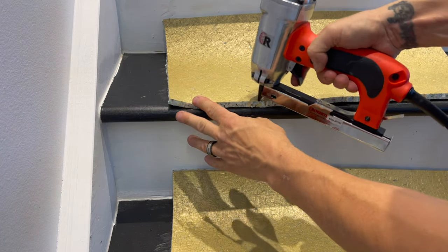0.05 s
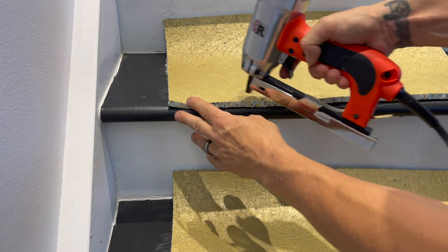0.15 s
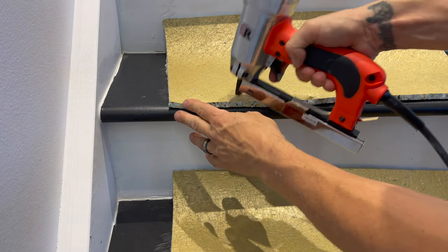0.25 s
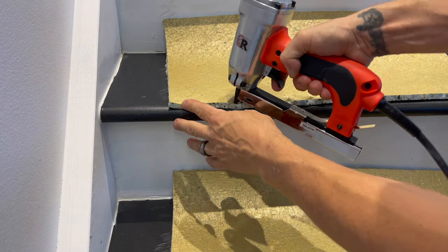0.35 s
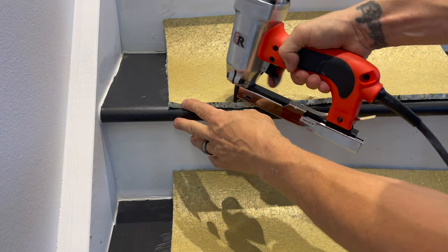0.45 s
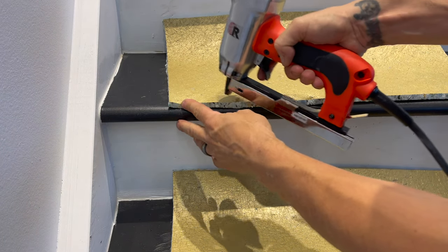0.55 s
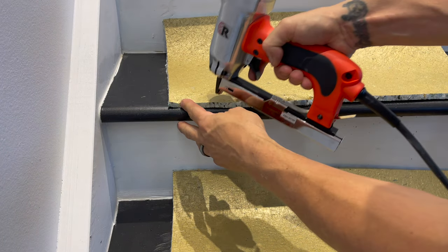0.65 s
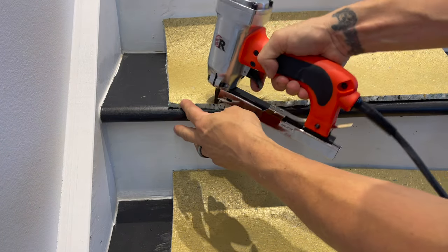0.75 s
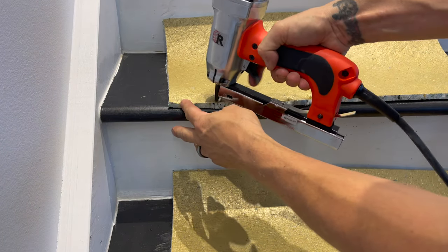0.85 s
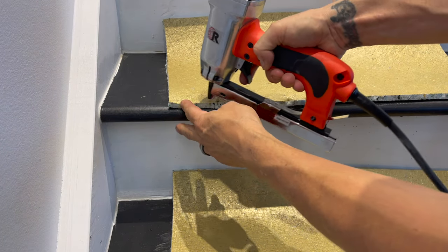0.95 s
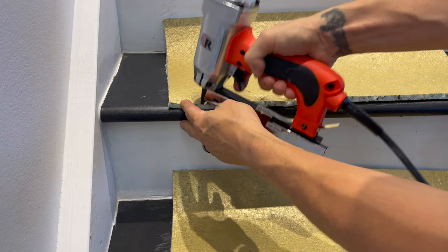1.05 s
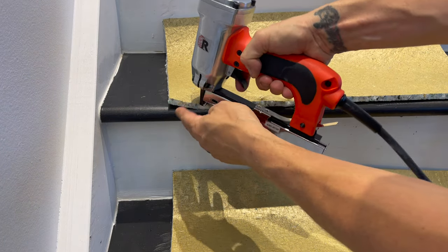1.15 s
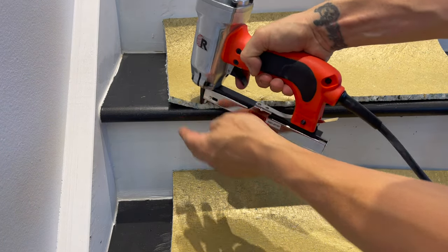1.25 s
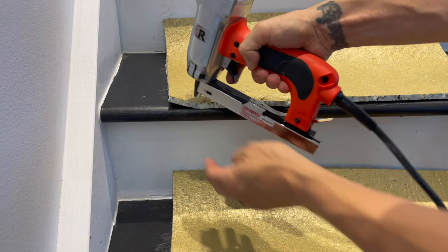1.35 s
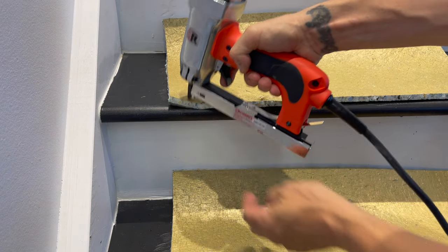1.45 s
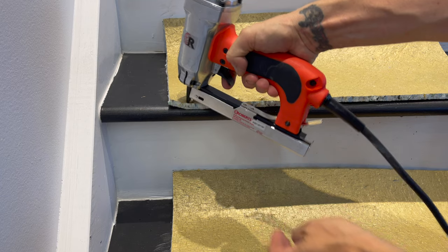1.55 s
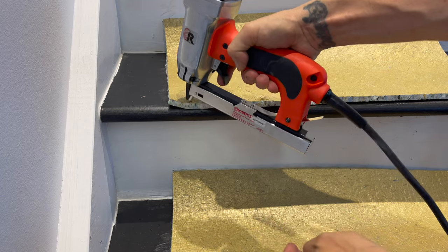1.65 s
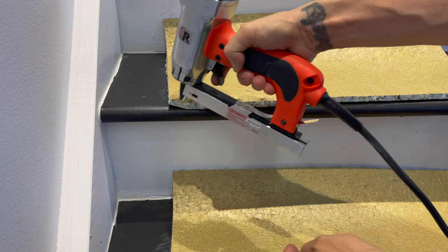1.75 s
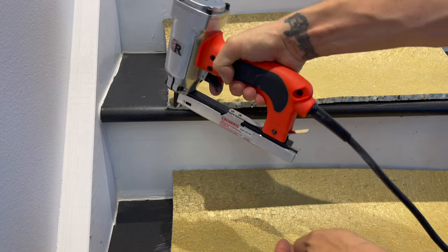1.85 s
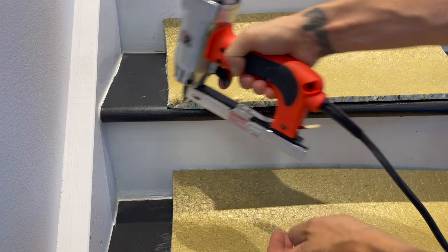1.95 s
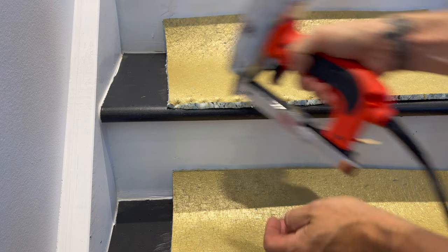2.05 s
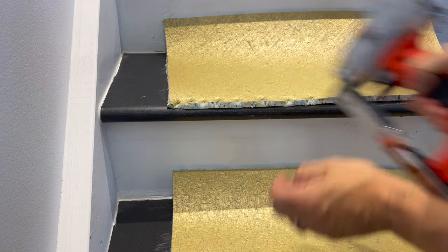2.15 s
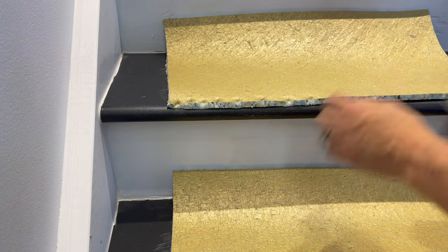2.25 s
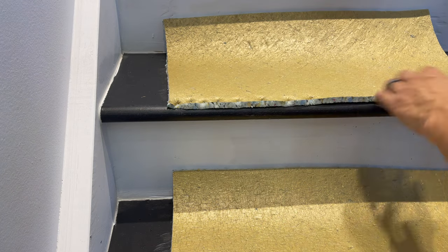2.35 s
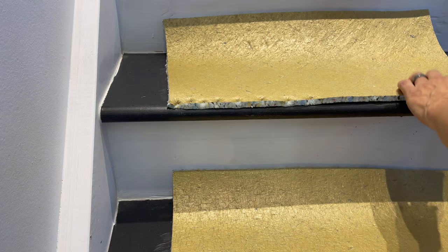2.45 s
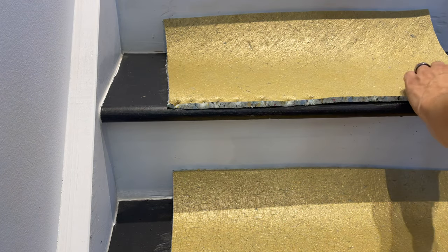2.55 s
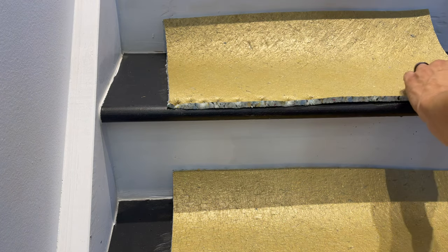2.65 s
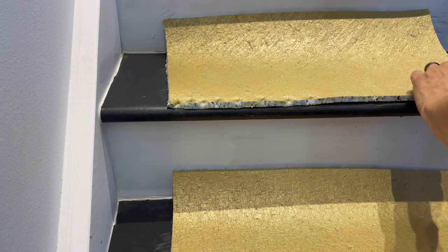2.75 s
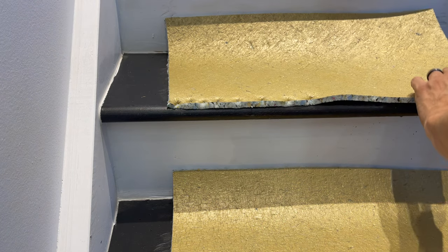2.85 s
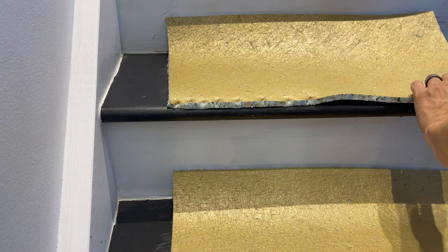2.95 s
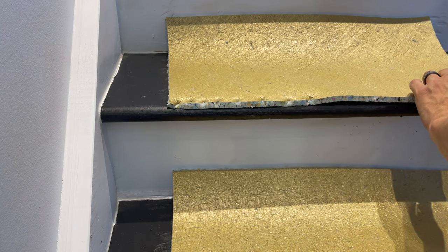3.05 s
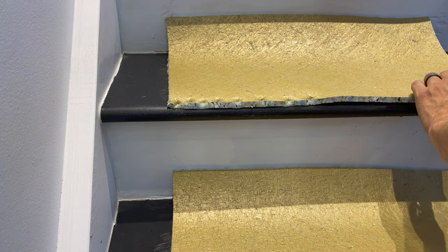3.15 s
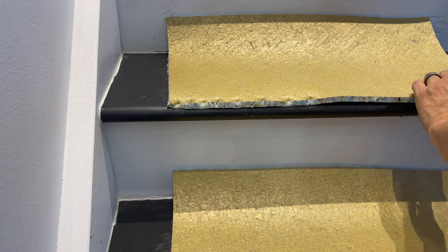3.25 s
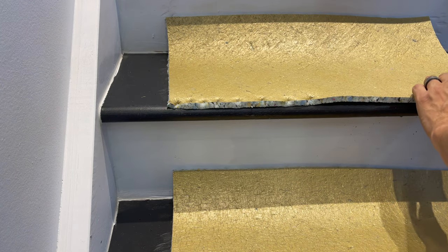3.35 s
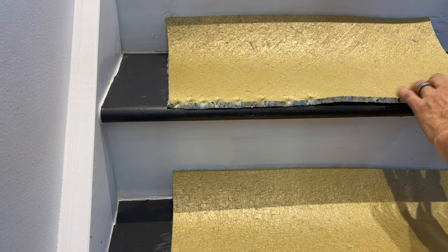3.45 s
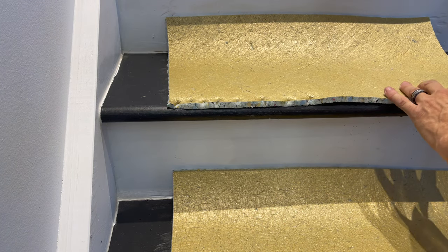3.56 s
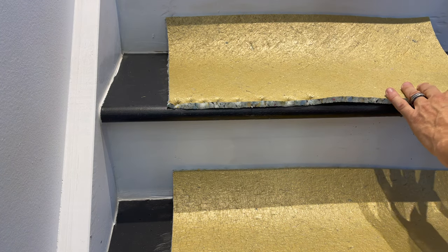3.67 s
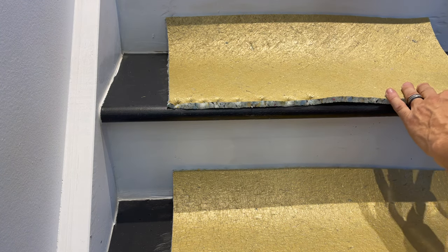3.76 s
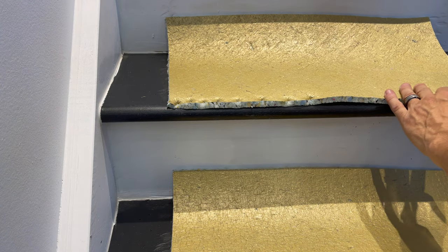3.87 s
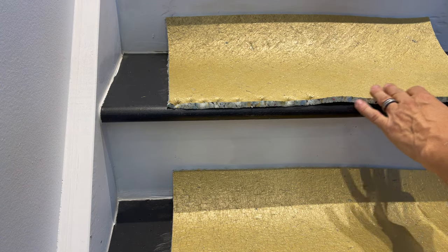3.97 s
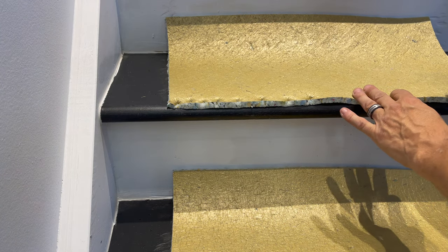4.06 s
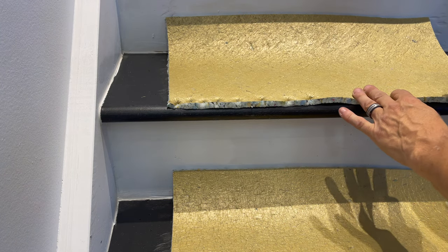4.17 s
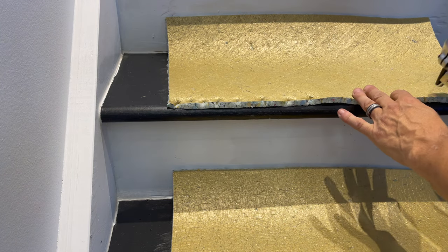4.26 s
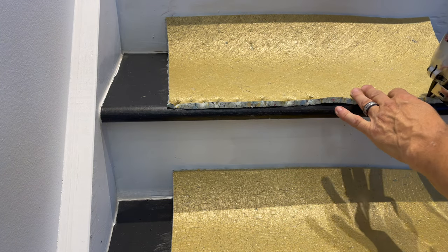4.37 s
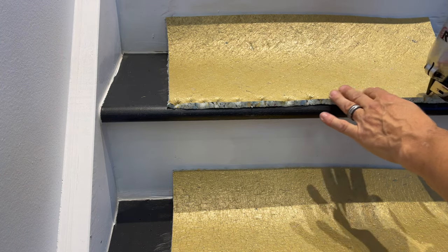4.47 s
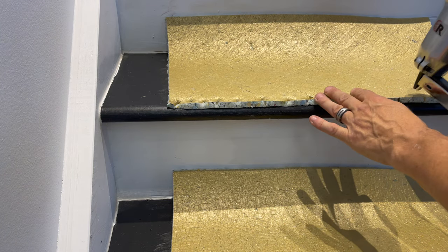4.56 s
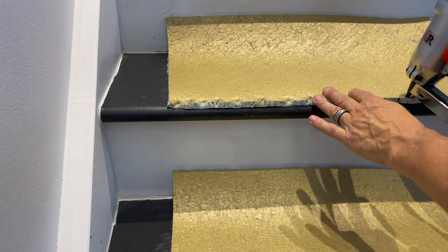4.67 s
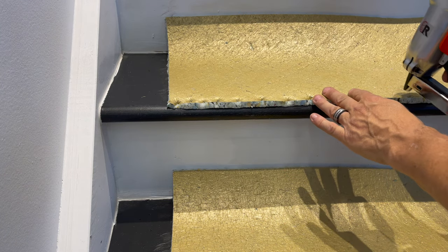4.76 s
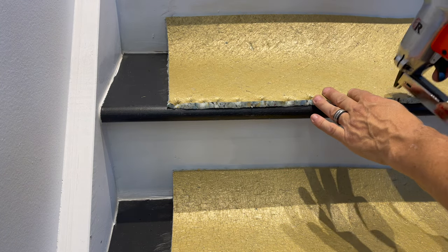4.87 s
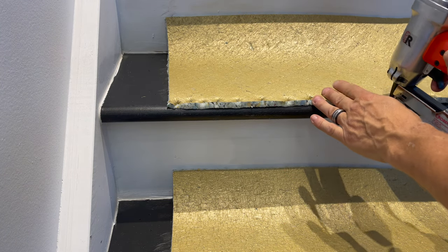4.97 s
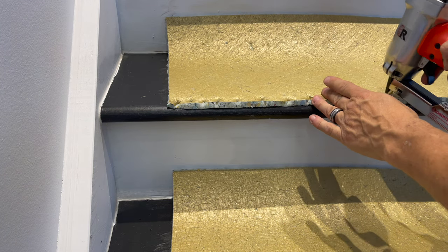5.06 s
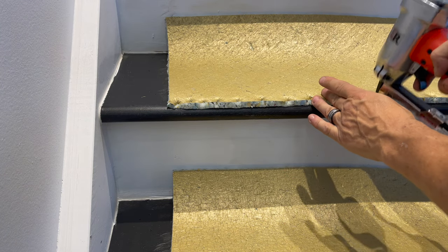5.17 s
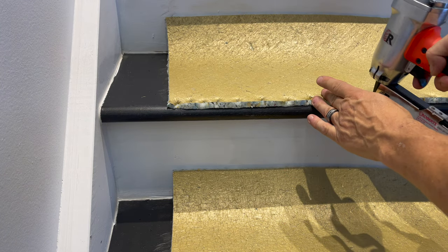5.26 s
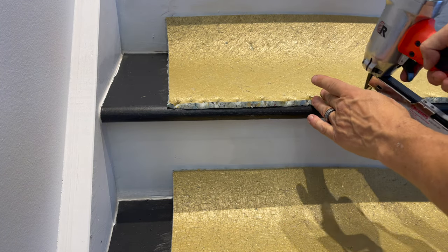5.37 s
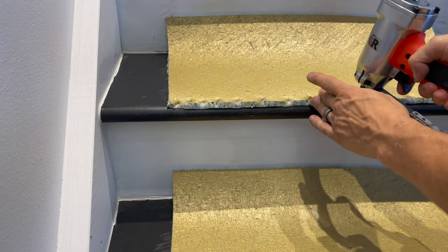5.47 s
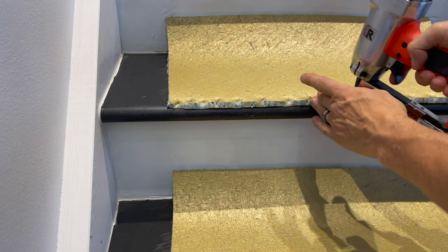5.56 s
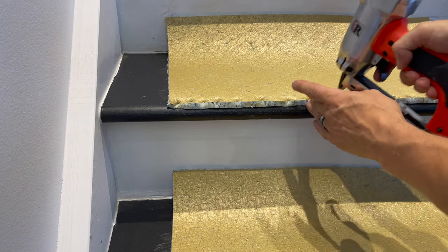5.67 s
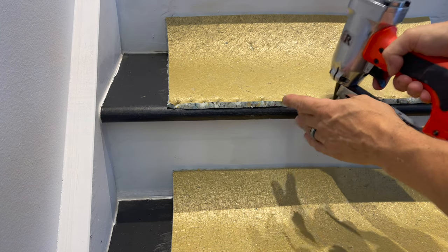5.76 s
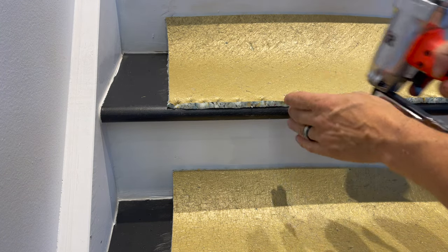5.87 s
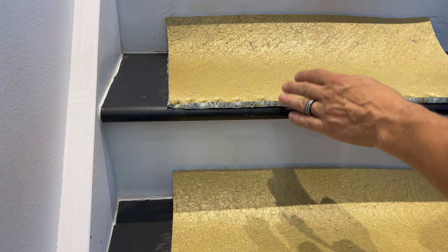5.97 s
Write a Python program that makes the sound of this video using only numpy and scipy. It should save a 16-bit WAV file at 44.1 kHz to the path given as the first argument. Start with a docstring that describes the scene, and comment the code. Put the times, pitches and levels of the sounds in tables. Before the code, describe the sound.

Indoors on a stair, loud snapping staple shots come in two runs, each a burst of metal rattle over a short wooden knock and low boom. Between the runs, hands rub cloth and padding, something is set down with dull knocks, and a barely audible squeak rises. The second run is faster and woodier, with light clicks and faint steel ringing. The phone is close, the peaks are squashed, and quiet room noise and hum lie beneath.

```python
"""Staple gun on a stair

An electric staple gun is pressed onto a padded wooden stair and fired, in two quick runs, close to a phone.
Each shot is chattering noise coloured by the metal casing, over struck modes of the hollow stair.
A small stairwell rings on as fading echo, over house noise and a faint mains hum of wavering tones.
Presses, ticks, trigger clicks, rubbing cloth, dull knocks, a thin squeak and two chimes fall in between."""
import sys
import numpy as np
from scipy import signal
from scipy.fft import rfft, irfft, next_fast_len
from scipy.io import wavfile
from scipy.ndimage import uniform_filter1d

SR = 44100
rng = np.random.default_rng(int(sys.argv[2]) if len(sys.argv) > 2 else 0)


def attenuation_scalar(level_db):
    """Turn a level in dB into a linear amplitude multiplier (20 dB per decade)."""
    decades = np.asarray(level_db, float) / 20
    return 10 ** decades


def inscribe(sig):
    """Save sig as 16-bit PCM at rate SR to the path in sys.argv[1].

    A 1-D sig is mono; a 2-D sig holds one channel per row.
    Samples are clipped to [-1, 1] before scaling.
    """
    pcm = np.round(np.clip(np.atleast_2d(sig).T, -1, 1) * 32767)
    wavfile.write(sys.argv[1], SR, pcm.astype(np.int16))


N = 265122
LEAD = 8820  # samples before time zero, for a shot already ringing


def evened(x):
    """Scales to rms 1."""
    return x / np.sqrt(np.mean(x ** 2) + 1e-20)


def read(points, hz):
    """Reads a table along log frequency."""
    f, value = np.transpose(points)
    return np.interp(np.log(hz + 1), np.log(f + 1), value)


def add(mix, s, sound):
    """Mixes a sound in at s seconds."""
    part = mix[LEAD + round(s * SR):][:len(sound)]
    part += sound[:len(part)]


def coloured(x, gain):
    """Filters x by a function of frequency."""
    size = next_fast_len(len(x))
    spectrum = rfft(x, size) * gain(np.fft.rfftfreq(size, 1 / SR))
    return irfft(spectrum, size)[:len(x)]


def ring(modes, contact_ms, seconds):
    """Modes struck by a force that lasts contact_ms: longer contact, duller sound."""
    t = np.arange(round(seconds * SR)) / SR
    sound = np.zeros(len(t))
    for hz, db, t60, *swing in modes:
        sound += np.prod(swing) * attenuation_scalar(db - 60 * t / t60) * np.cos(2 * np.pi * hz * t)
    u = np.arange(441) / SR * 1000 / contact_ms
    force = np.sin(np.pi * np.minimum(u, 1)) ** 2
    return signal.oaconvolve(sound, force / force.sum())


def rattle(t60_ms, rise_ms, grit_db):
    """A burst of metal parts chattering: noise made of uneven clicks."""
    ms = np.arange(4000) / SR * 1000
    click_size = np.repeat(rng.standard_normal(4000 // 16), 16)
    noise = evened(rng.standard_normal(4000) * attenuation_scalar(grit_db * click_size))
    return noise * (1 - np.exp(-ms / rise_ms)) ** 2 * attenuation_scalar(-60 * ms / t60_ms)


# broad resonances of the casing: f/Hz, width/Hz
CASING_RESONANCES = [(1650, 190), (2050, 160), (2830, 78), (4300, 83), (5050, 210), (5800, 420),
                     (7800, 230), (9900, 43)]
# the gun's broad colour: f/Hz, level/dB
CASING_COLOUR = [(150, -31), (300, -8.5), (700, -5), (1200, -5), (2000, -3.5), (3500, -7.5), (6000, -13.5),
                 (10000, -20), (15300, -23), (16500, -51)]


def gun_body(x, tilt_db, ring_hz, ring_db):
    """The casing colours every rattle causally: a broad spectrum with resonances on top."""
    hz = abs(np.fft.fftfreq(2048, 1 / SR))
    # each blow wakes the resonances unevenly
    struck = 0.26 * attenuation_scalar(4.7 * rng.standard_normal(len(CASING_RESONANCES)))
    peaks = attenuation_scalar(ring_db) / (1 + ((hz / ring_hz - 1) / .07) ** 2)
    for height, (f, width) in zip(struck, CASING_RESONANCES):
        peaks += height / (1 + (2 * (hz - f) / width) ** 2)
    tilt = tilt_db * np.log2((hz + 300) / 2500)  # dB per octave, roughly
    gain = attenuation_scalar(read(CASING_COLOUR, hz) + tilt + 7.5) * (1 + peaks)
    minimum_phase = np.exp(np.conj(signal.hilbert(np.log(gain + 1e-5))))
    response = np.fft.ifft(minimum_phase).real
    return signal.oaconvolve(x, response[:1024])


# the hollow stair and the air in the stairwell: f/Hz, level/dB, t60/s, swing (weight, + out, - in)
BOOM_MODES = [(95, 0, 0.023, 0.33), (96.5, -4.5, 0.14, -0.87), (114.3, -1, 0.3, -0.87),
              (117, -41.5, 1.4, -1.7), (130.7, -22, 0.91, 0.88), (153.2, -16, 0.026, 1)]


def stair_boom(contact_ms, seconds):
    """The low modes of the hollow stair and its air, set off by one push."""
    return ring(BOOM_MODES, contact_ms, seconds)


# the wood of the stair: f/Hz, level/dB, t60/s, swing (weight, + out, - in)
WOOD_MODES = [(190.3, -6, 0.034, 1), (245.8, -9, 0.09, 0.51), (290.7, -1, 0.063, 0.71),
              (358.3, -10, 0.22, -1), (390.8, -5.5, 0.052, 1), (432.8, -9, 0.15, -1),
              (482.3, -8, 0.17, 0.92), (576.5, -4.5, 0.082, 1), (623, -11.5, 0.054, 1),
              (723, -15.5, .06, 0.77), (964, -2, 0.047, 0.99), (1056, -20.5, 0.016, 0.14)]


def tread_knock():
    """The wood struck by the driver; each spot on the tread wakes the modes unevenly."""
    modes = []
    for hz, db, *rest in WOOD_MODES:
        shift, level = rng.standard_normal(2)
        modes.append((hz * (1 + .015 * shift), db + 2.2 * level, *rest))
    return ring(modes, 0.58, 0.32)  # the driver bears on the wood for 0.58 ms


def hand_push():
    """A hand's push: the wood sounds duller than under a shot, with the low boom under it."""
    return attenuation_scalar(-3.5) * ring(WOOD_MODES, 2.22, 2) + stair_boom(1.6, 2)


# fading of the stairwell: f/Hz, t60/s
STAIRWELL_T60 = [(200, 0.5), (560, 0.31), (1470, 0.29), (3000, 0.28), (5000, 0.3), (7500, 0.25),
                 (10500, 0.25), (13000, 0.21), (16000, 0.064)]


def dying(x, longer=1):
    """Makes each band of x fade at the stairwell's own speed, its t60 stretched by longer."""
    hz, t, z = signal.stft(x, SR, nperseg=256)
    fade = attenuation_scalar(-60 * t / longer / read(STAIRWELL_T60, hz)[:, None])
    return signal.istft(z * fade, SR, nperseg=256)[1]


def dense_echo():
    """The thick echo of a blow: fading noise that builds up over the first reflections."""
    near, far = rng.standard_normal((2, SR // 2))
    swell = 1 - np.exp(-np.arange(SR // 2) / SR / 0.0056)
    echo = dying(near) + attenuation_scalar(-18.5) * dying(far, longer=2.55)  # rooms beyond ring longer
    return echo[:SR // 2] * swell


# shots: t/s of the driver's blow, gun level/dB, stair boom level/dB, launch level/dB, casing ring f/Hz
SHOTS = [(-.09, -3.5, -12, -7.5, 2100), (0.3283, -1, -12.5, -14.5, 2386), (0.7464, -1, -14, -9, 2150),
         (1.129, 0, -16.5, -22, 1593), (1.5135, -3, -16.5, 1.5, 2210), (1.8295, -1, -16.5, -5.5, 1946),
         (3.3635, -1.5, -14.5, -11, 1780), (3.6976, -2, -14, -10, 2164), (4.014, -1.5, -12, -18, 2116),
         (4.315, -2.5, -12, -14, 2020), (4.6149, -1, -13, -17.5, 2144), (4.8976, -1.5, -12.5, -12.5, 2078),
         (5.182, -2, -11, -15, 2835), (5.4316, -2, -9.5, -10, 2147), (5.699, -1.5, -9, -27, 2226)]
# strokes inside one shot: t/ms after the blow, level/dB, rattle t60/ms, share reaching the stair (0-1)
STROKES = [(0, 5, 39.2, 0.17), (4.508, 3, 30, 0.7), (10.103, -2.5, 12, 0.3), (17.55, -7.5, 16, 0.4),
           (31.46, -13.5, 21, 0)]
# the wooden knock of a shot, which grows along each run: t/s, level/dB
TREAD_LEVEL = [(.3, -10), (1.83, -8), (3.36, -9), (4.3, -6), (5.7, -5)]


def shots(metal, stair, wash):
    """The coil launches the driver, which lands in several strokes on casing and stair."""
    launch_ms, tilt_db = 3.4, 1.43  # launch before landing; brightness per octave
    boom = stair_boom(2.2, 1.5)
    for s, gun_db, boom_db, launch_db, ring_hz in SHOTS:
        launch = gun_body(rattle(60, 0.24, 2.1), tilt_db + 2.0, ring_hz, -3)
        add(metal, s - launch_ms / 1000, attenuation_scalar(launch_db) * launch)
        wood = attenuation_scalar(np.interp(s, *np.transpose(TREAD_LEVEL))) * tread_knock()
        for ms, db, t60_ms, share in STROKES:
            stroke = gun_body(rattle(t60_ms, .2, 0.97), tilt_db, ring_hz, -1.4)
            add(metal, s + ms / 1000, attenuation_scalar(gun_db + db) * stroke)
            add(stair, s + ms / 1000, share * wood)
        # the boom starts 1.5 ms early, to make up for the bass filter's delay
        add(stair, s - .0015, attenuation_scalar(boom_db) * boom)
        echo = gun_body(dense_echo(), tilt_db + .5, 2000, -20)
        add(wash, s, attenuation_scalar(gun_db - 15.5) * echo)


def stairwell(x):
    """Sparse reflections of random sign; three tails take turns."""
    turn, out = np.arange(len(x)) / SR * 2.3, np.zeros(len(x))
    for k in range(3):
        taps = np.zeros(SR)
        at = np.arange(300, SR - 20, 16)
        taps[at + rng.integers(0, 16, len(at))] = rng.choice([-1., 1.], len(at))
        tail = dying(taps)
        window = np.cos(turn + k * np.pi / 3) * np.sqrt(2 / 3)
        out += signal.oaconvolve(x * window, tail / np.linalg.norm(tail))[:len(x)]
    return out


# colour of the house noise: f/Hz, level/dB per Hz before the whole is set to its rms
AIR_COLOUR = [(20, -23), (40, -13.5), (70, -11.5), (120, -1), (180, -20.5), (245, -13.5), (330, -10),
              (600, -12.5), (960, -17), (1600, -20.5), (5000, -31), (8000, -37), (15000, -45.5),
              (16600, -45.5)]


def house_air():
    """Quiet house noise: steady noise through a fixed colour, at -69 dB rms."""
    noise = coloured(rng.standard_normal(N), lambda hz: attenuation_scalar(read(AIR_COLOUR, hz)))
    return attenuation_scalar(-69) * evened(noise)


# mains and appliance tones: f/Hz, level/dB
HUM_TONES = [(118.4, -79), (242.2, -81.5), (371.4, -85.5), (565.2, -86), (947.5, -83), (990.5, -83.5)]


def mains_hum():
    """Low tones whose pitch and level waver together."""
    hum = np.zeros(N)
    for hz, db in HUM_TONES:
        waver = evened(uniform_filter1d(uniform_filter1d(rng.standard_normal(N), 900), 900))
        turns = 2 * np.pi * np.cumsum(hz + 1.1 * waver) / SR
        hum += attenuation_scalar(db + 3.6 * waver) * np.sqrt(2) * np.sin(turns)
    return hum


# one thin bright tick: f/Hz, level/dB, t60/s
JITTER_MODES = [(5000, 3, .016), (6500, -7, .006), (8500, -4, .007), (9600, -3, .007), (10500, -4, 0.008),
                (13000, -13, .004)]


def jitter(metal):
    """A fading patter of thin bright ticks follows each shot, each tick a little off pitch and time."""
    after_s, length_s, per_s = .105, .3, 77
    start_db, fade_db_per_s = -54, 36.5  # start relative to the shot's gun level
    for shot, gun_db, *_ in SHOTS:
        for since in np.arange(0, length_s, 1 / per_s):
            late, size, *uneven = rng.standard_normal(2 + len(JITTER_MODES))
            modes = [(hz * (1 + 0.025 * u), db, t60) for (hz, db, t60), u in zip(JITTER_MODES, uneven)]
            level_db = gun_db + start_db + 1.5 * size - fade_db_per_s * since
            add(metal, shot + after_s + since + 0.0004 * late, attenuation_scalar(level_db) * ring(modes, .04, .03))


# the nose is pressed onto the pad: t/s, rattle level/dB, stair boom level/dB, casing ring f/Hz
PRESSES = [(0.2615, -32, -39.5, 3000), (0.6755, -27, -34.5, 1920), (1.444, -28.5, -35.5, 2020),
           (1.7911, -22, -26, 2280), (3.645, -20.5, -19, 1952), (3.971, -27.5, -18, 2130),
           (4.2803, -18.5, -16.5, 2130), (4.5732, -24, -19.5, 2080), (4.8679, -16, -12, 2830),
           (5.136, -24, -15.5, 3000), (5.3965, -21, -19.5, 3000), (5.6636, -13, -10.5, 2380)]


def presses(metal, stair):
    """The nose rattles on the pad, which gives a moment before the stair takes the push."""
    t60_ms, tilt_db, give_s = 43, -2, 0.0015
    push = hand_push()
    for s, db, boom_db, ring_hz in PRESSES:
        touch = gun_body(rattle(t60_ms, 0.77, 2.9), tilt_db, ring_hz, 8.9)
        add(metal, s - .001, attenuation_scalar(db) * touch)
        add(stair, s + give_s, attenuation_scalar(boom_db) * push)


# loose parts tick: t/s, level/dB, casing ring f/Hz, brightness/dB per octave
TICKS = [(0.295, -42, 1920, 3), (0.696, -34, 3340, -2), (1.016, -36, 1600, -6), (1.035, -29.5, 2270, -3.5),
         (1.057, -51, 9800, 2), (1.09, -36.5, 3820, 2.5), (1.466, -45.5, 9410, 2), (1.782, -45, 1978, 2.5),
         (3.33, -49, 7500, 10)]


def loose_ticks(metal):
    """Loose parts tick: short rattles through the casing, each with its own ring and brightness."""
    t60_ms, ring_db = 18, 4
    for s, db, ring_hz, bright_db in TICKS:
        tick = gun_body(rattle(t60_ms, 1.4, 3.0), bright_db, ring_hz, ring_db)
        add(metal, s - .001, attenuation_scalar(db) * tick)


# colour of the rustle: f/Hz, level/dB per Hz before the whole is set to rms 1
RUSTLE_COLOUR = [(200, -26), (380, 5.5), (600, -7.5), (900, 1.5), (1300, -10), (2200, -9), (3200, -10),
                 (4300, -9.5), (6000, -14.5), (7500, -19.5), (10300, -15.5), (13000, -22), (15000, -33)]
# strokes of cloth and pad: t/s of the peak, rise/s, fall/s, level/dB at the peak
RUBS = [(2.05, 0.041, 0.13, -70), (2.2, 0.11, 0.29, -61.5), (2.4, .03, .03, -73),
        (2.53, 0.072, 0.16, -63.5), (2.79, 0.081, 0.065, -68), (3.0, 0.046, 0.034, -74),
        (3.12, .05, .1, -81), (3.33, 0.18, 0.083, -60.5)]


def rubbing():
    """Cloth and pad rub while the hands move: patchy coloured noise, each stroke swelling and fading."""
    edge_db = -16  # level one rise before and one fall after the peak, relative to it
    t = np.arange(N) / SR
    patches = evened(uniform_filter1d(rng.standard_normal(N), 500))
    noise = rng.standard_normal(N) * attenuation_scalar(1.8 * patches)
    rustle = evened(coloured(noise, lambda hz: attenuation_scalar(read(RUSTLE_COLOUR, hz))))
    envelope = np.zeros(N)
    for s, rise, fall, db in RUBS:
        distance = np.where(t < s, (s - t) / rise, (t - s) / fall)
        envelope += attenuation_scalar(db + edge_db * distance)
    return rustle * envelope


# dull knocks of something set down: t/s, peak level/dB, t60 factor
KNOCKS = [(2.076, -35.5, 0.97), (2.083, -31.5, 0.53), (2.601, -32.5, 1)]
# the knocked wood: f/Hz, level/dB, t60/s before the knock's factor
KNOCK_MODES = [(296, -8, .04), (354, 2, .035), (405, 10, 0.031), (510, -2, 0.043), (610, -5, 0.06),
               (771, -4, 0.11), (1250, -3, 0.036), (1700, -29, .02), (3000, -32, .015)]


def knocks():
    """Soft wooden knocks a little way off: struck modes, each knock with its own decay."""
    out = np.zeros(N + LEAD)
    for s, db, longer in KNOCKS:
        modes = [(hz, mode_db, t60 * longer) for hz, mode_db, t60 in KNOCK_MODES]
        sound = ring(modes, 0.46, .5)
        add(out, s - .001, attenuation_scalar(db) * sound / abs(sound).max())
    return out


# a thin squeak glides up: start t/s, length/s, from f/Hz, to f/Hz, level/dB, octave above it level/dB
SQUEAK = (3.095, .12, 5930, 6330, -94, 12)


def squeak():
    """A faint rising squeak with a fluttering level, strongest on its octave."""
    start, length, from_hz, to_hz, db, octave_db = SQUEAK
    u = np.clip((np.arange(N) / SR - start) / length, 0, 1)
    turns = 2 * np.pi * np.cumsum(from_hz + (to_hz - from_hz) * u ** 2) / SR
    flutter = evened(uniform_filter1d(rng.standard_normal(N), 400))
    shape = np.sqrt(np.sin(np.pi * u).clip(0)) * attenuation_scalar(db + 3 * flutter)
    return shape * (np.sin(turns) + attenuation_scalar(octave_db) * np.sin(2 * turns))


# the trigger clicks just before a shot: t/s, level/dB
TRIGGER = [(3.2897, -51), (3.664, -36), (3.991, -31), (4.595, -27), (5.161, -28), (5.417, -33),
           (5.690, -25)]


def trigger_clicks(metal):
    """The trigger clicks: a short dull rattle with one strong ring of the casing."""
    t60_ms, tilt_db, ring_hz, ring_db = 22, -9, 1450, 17
    for s, db in TRIGGER:
        click = gun_body(rattle(t60_ms, 1.4, 2.9), tilt_db, ring_hz, ring_db)
        add(metal, s - .001, attenuation_scalar(db) * click)


# a thin steel part left ringing: t/s, f/Hz, level/dB, t60/s
CHIMES = [(3.719, 3230, -39.5, 0.44), (5.721, 1637, -46, 0.79)]


def chimes(metal):
    """A thin steel part left ringing: one mode, briefly struck."""
    for s, *mode in CHIMES:
        add(metal, s, ring([mode], 0.12, .6))


def scene():
    """Everything struck, its echo, and the house."""
    metal, stair, wash = np.zeros((3, N + LEAD))
    shots(metal, stair, wash)
    jitter(metal)
    presses(metal, stair)
    loose_ticks(metal)
    trigger_clicks(metal)
    chimes(metal)
    no_bass = signal.butter(4, 70, "high", fs=SR, output="sos")  # a small stair radiates no deep bass
    stair = signal.sosfilt(no_bass, stair)
    knock = knocks()
    wet = stairwell(attenuation_scalar(-17) * metal + attenuation_scalar(-20.0) * stair + attenuation_scalar(-11) * knock)
    struck = (metal + stair + knock + wash + wet)[LEAD:]
    return (struck + house_air() + mains_hum() + rubbing() + squeak())[None]


def top_cut(x):
    """Nothing passes above the cut-off."""
    return signal.sosfilt(signal.butter(12, 16780, fs=SR, output="sos"), x)


def record(dry):
    """The small microphone rolls off the top treble and overloads softly on loud peaks."""
    dulled = signal.sosfilt(signal.butter(4, 16000, fs=SR, output="sos"), dry)
    ceiling, knee = .78, 3.5  # full scale is 1; a higher knee bends later and harder
    squeezed = dulled / (1 + abs(dulled / ceiling) ** knee) ** (1 / knee)
    band_limit = signal.cheby2(10, 60, 16800, fs=SR, output="sos")
    finished = signal.sosfilt(band_limit, squeezed)
    return top_cut(finished)


dry = scene()
out = record(dry)
inscribe(out)
```